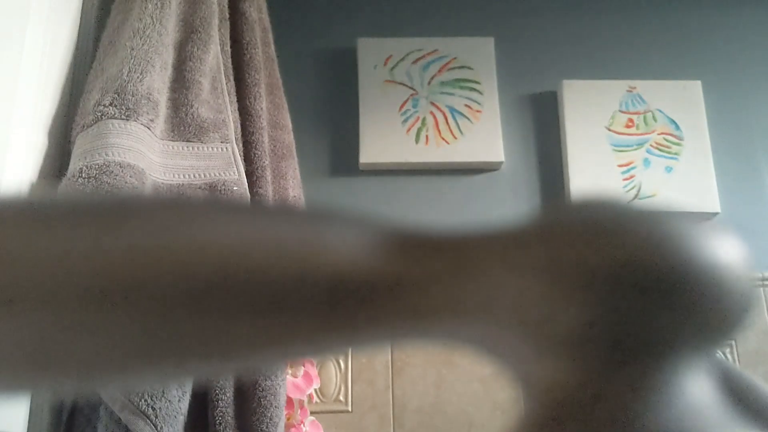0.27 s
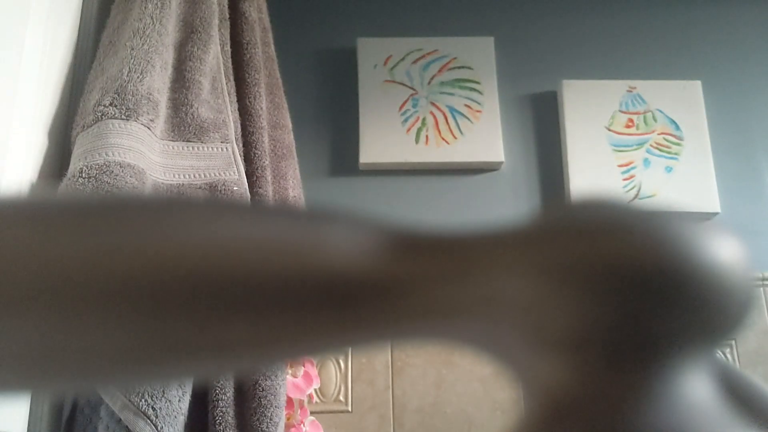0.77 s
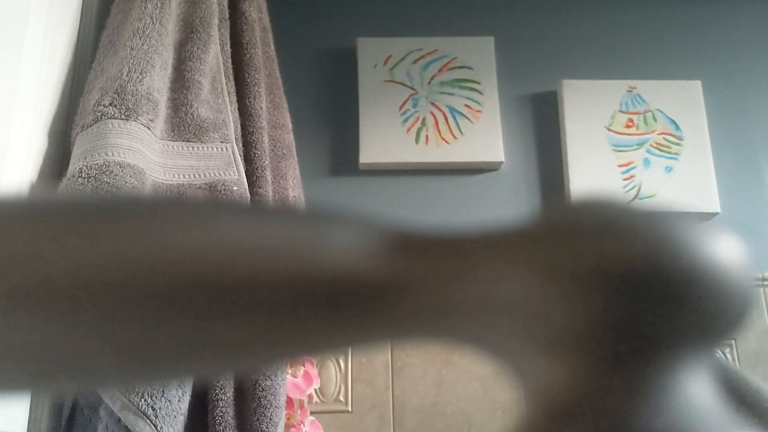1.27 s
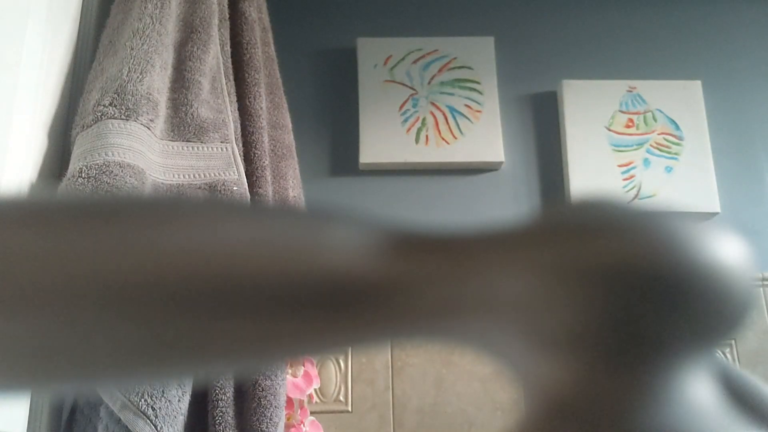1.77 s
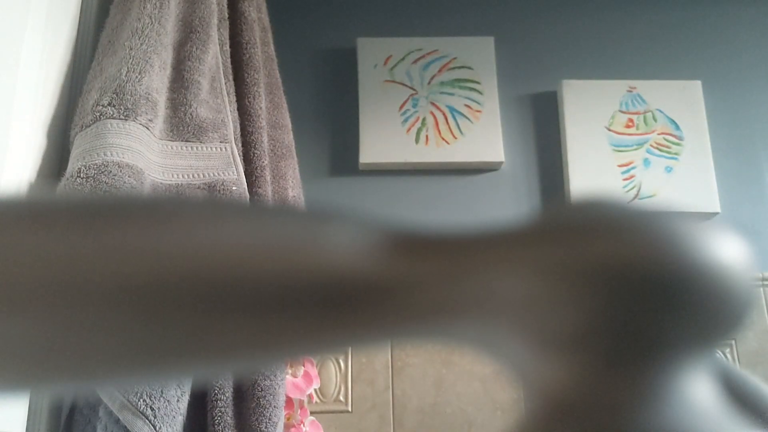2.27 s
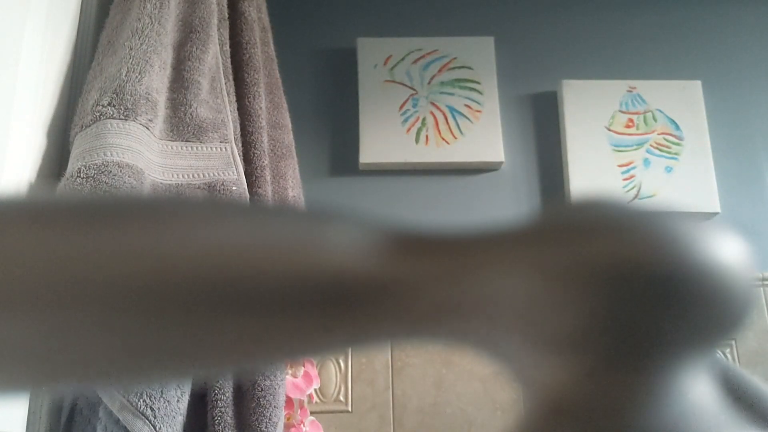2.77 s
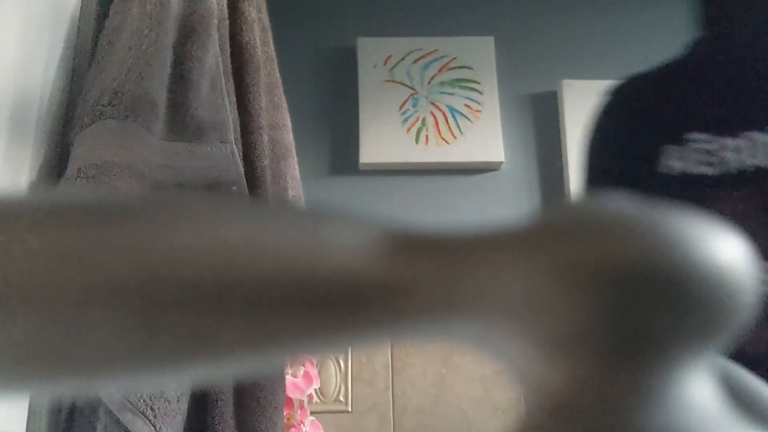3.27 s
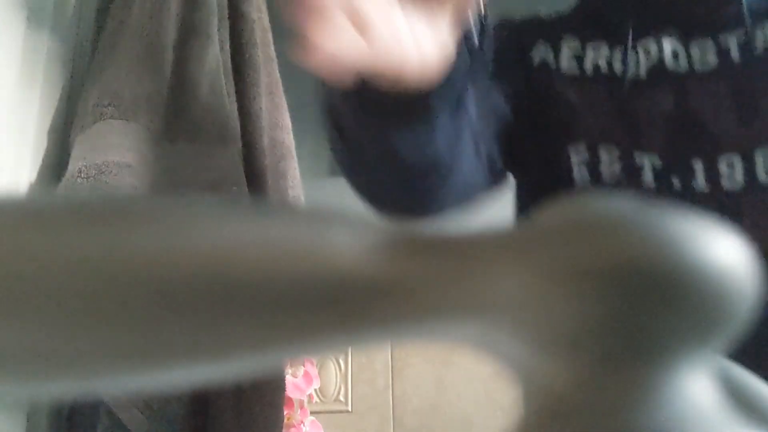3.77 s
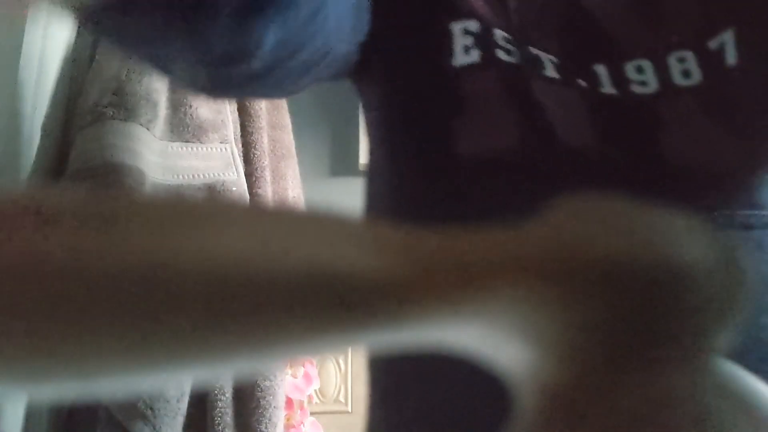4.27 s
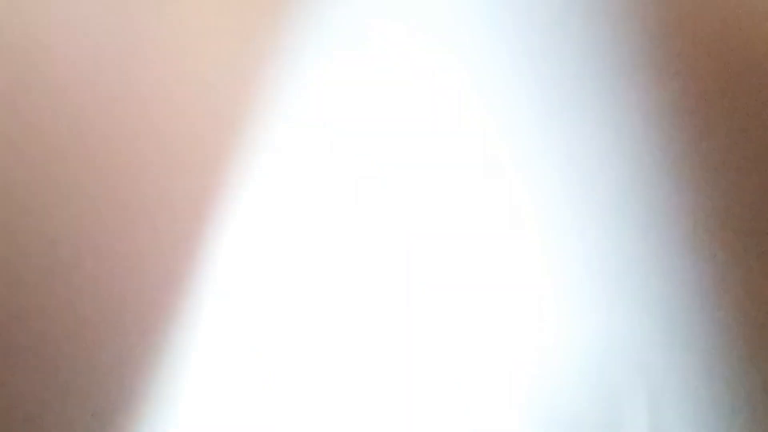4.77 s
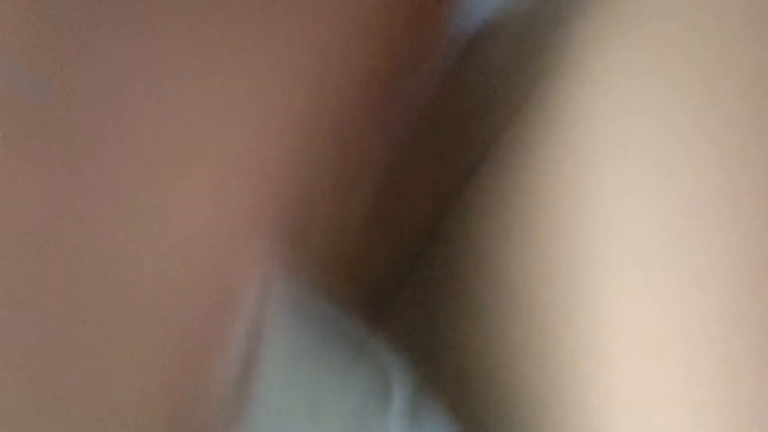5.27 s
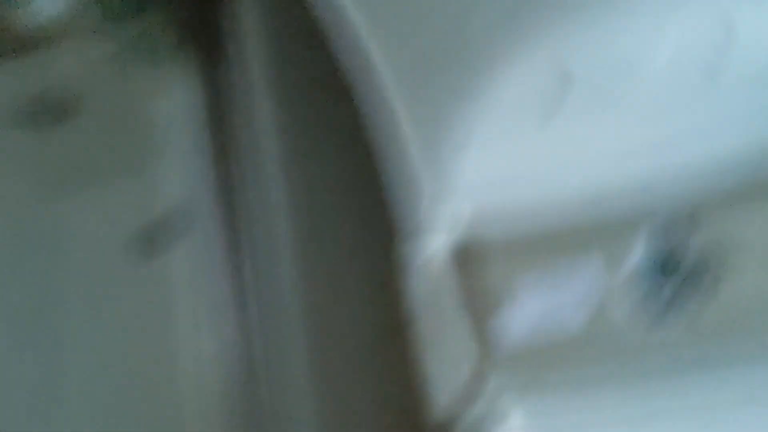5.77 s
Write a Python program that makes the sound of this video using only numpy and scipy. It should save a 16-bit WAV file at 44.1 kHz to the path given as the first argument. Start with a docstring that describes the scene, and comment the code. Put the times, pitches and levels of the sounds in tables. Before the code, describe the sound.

A phone microphone rests in a quiet, short-echoing bathroom. A footstep and fabric rustle come first, then delicate ceramic clinks and a pause. A sharp porcelain crack rings out, followed by rapid dull hollow bumps as the lid settles. Someone shuffles over, clothes brushing, and grabs the phone, with chattering plastic knocks, booming pressure thumps, taps and gritty rubbing until the end.

```python
"""First a low rumble and thin hiss, rustling cloth and a step; then a porcelain lid clinks, knocks and bumps
down hollowly in a small tiled bathroom. A hand picks up the phone, whose case it thumps, taps and rubs.
The lid sounds by modal synthesis, the steps by decaying noise, the air and cloth by filtered noise.
The finger sounds are pressure pulses, broadband impacts and granular friction, close to two microphones."""
import sys
import numpy as np
from scipy import signal
from scipy.fft import rfft, irfft, next_fast_len
from scipy.io import wavfile
from scipy.ndimage import uniform_filter1d

SR = 44100
rng = np.random.default_rng(int(sys.argv[2]) if len(sys.argv) > 2 else 0)


def wrap_up_sound(samples):
    """Save the sound to the file named by the first command line argument, as 16-bit audio."""
    columns = np.atleast_2d(samples).T
    # keep every value between -1 and 1, then stretch to whole-number steps
    tamed = np.clip(columns, -1, 1)
    steps = np.round(tamed * 32767).astype(np.int16)
    wavfile.write(sys.argv[1], SR, steps)


N = 264776
T = np.arange(N) / SR


def amp(db):
    """Converts a level in decibels to a linear amplitude ratio."""
    return 10 ** (np.asarray(db) / 20)


def unit(x):
    """Normalises the root mean square to one."""
    return x / np.sqrt(np.mean(x ** 2) + 1e-20)


def read(points, hz):
    """Interpolates a table linearly over logarithmic frequency."""
    f, value = np.transpose(points)
    return np.interp(np.log(hz + 1), np.log(f), value)


def add(mix, s, sound):
    """Superposes a stereo sound on the mix from time s."""
    part = mix[:, max(round(s * SR), 0):][:, :sound.shape[1]]
    part += sound[:, :part.shape[1]]


def coloured(x, db_at):
    """Zero-phase linear filtering: scales the spectrum by a function from Hz to dB."""
    length = x.shape[-1]
    size = next_fast_len(length)
    gain = amp(db_at(np.fft.rfftfreq(size, 1 / SR)))
    return irfft(rfft(x, size) * gain, size)[..., :length]


def octaves(hz):
    """Logarithmic pitch distance: octaves above 1 kHz, held constant below 100 Hz."""
    return np.log2(np.maximum(hz, 100) / 1000)


def resonance_db(f, hz, width_hz):
    """Resonance curve: the level falls 6 dB at width_hz either side of the centre."""
    return -20 * np.log10(1 + ((f - hz) / width_hz) ** 2)


def stroke(t, length, attack_s, release_s):
    """Movement envelope: linear attack from t = 0, hold, then exponential release."""
    return np.clip(t / attack_s, 0, 1) * np.exp(-np.maximum(t - length, 0) / release_s)


# still air in the room: [f/Hz, spectral level/dB per Hz]
AIR_COLOUR = [(15, -2.5), (35, -7.5), (70, -16), (110, -15.5), (200, -19), (300, -17), (400, -25.5),
              (700, -23), (1050, -23), (1500, -34.5), (2000, -35), (4500, -34), (10000, -43.5),
              (16000, -53)]
# peaks and a dip in the colour of the rumble and hiss: [f/Hz, width/Hz, level/dB]
AIR_PEAKS_AND_DIP = [(101.4, 3.5, 11), (251.5, 5.3, 8.5), (530, 120, 5.5), (2880, 330, 3), (3430, 130, 2),
                     (6470, 230, -6.5), (7440, 550, 4.5), (9490, 600, 5.5)]


def room_noise():
    """Stationary noise: one coloured spectrum, split at 250 Hz into rumble and hiss."""
    def level_db(f):
        local_db = sum(db * np.exp(-((f - hz) / width) ** 2) for hz, width, db in AIR_PEAKS_AND_DIP)
        return read(AIR_COLOUR, f) + local_db

    noise = coloured(rng.standard_normal((2, N)), level_db)
    low = signal.sosfiltfilt(signal.butter(4, 250, fs=SR, output="sos"), noise)
    return unit(low), unit(noise - low)


def air(rumble_db=-47.0, hiss_db=-55.5):
    """Superposition of stationary noises: a steady low rumble and a thin hiss."""
    rumble, hiss = room_noise()
    return amp(rumble_db) * rumble + amp(hiss_db) * hiss


# clothing rustles while the body moves: [start t/s, length/s, level/dB]
CLOTH_MOVES = [(0, 0.29, -52), (0.49, 0.92, -59.5), (2.753, 1.76, -56), (3.124, 0.15, -53),
               (3.82, 0.045, -47.5), (4.25, 0.14, -51), (4.629, 1.7, -53)]


def clothing(tilt=2, attack_s=0.036, release_s=0.054):
    """Power addition of movements: cloth hisses with each one, tilt dB per octave brighter than the air."""
    _, hiss = room_noise()
    cloth = unit(coloured(hiss, lambda f: tilt * octaves(f)))
    power = np.zeros(N)
    for s, length, db in CLOTH_MOVES:
        power += (amp(db) * stroke(T - s, length, attack_s, release_s)) ** 2
    return cloth * np.sqrt(power)


# reverberation of the tiled room: [f/Hz, t60/s]
ROOM = [(100, 0.37), (500, 0.34), (1500, 0.32), (4000, 0.36), (8000, 0.3), (16000, 0.37)]


def tail(colour, tilt):
    """Diffuse reverberation: a burst scattered by the tiles, each band dying at the room's pace."""
    noise = rng.standard_normal((2, SR * 3 // 4))
    noise = unit(coloured(noise, lambda f: read(colour, f) + tilt * octaves(f)))
    hz, t, bands = signal.stft(noise, SR, nperseg=256)
    decay_db = -60 * t / read(ROOM, hz)[:, None]
    return signal.istft(bands * amp(decay_db), SR, nperseg=256)[1][:, :noise.shape[1]]


# steps around the room: [t/s, level/dB, brightness/dB per octave]
STEPS = [(.096, -34.5, .5), (0.554, -49.5, -1.5), (3.088, -38.5, -2), (3.301, -49, 2), (3.672, -47.5, 2),
         (3.754, -45, -1.5), (4.065, -37, 1.5)]
# a step's noise: [f/Hz, spectral level/dB per Hz]
STEP_COLOUR = [(50, -31), (150, -4), (270, 4.5), (600, 2.5), (950, 2.5), (1500, -17), (2000, -13.5),
               (2800, -13), (3800, -16.5), (5200, -18), (8000, -28.5), (12000, -33), (16000, -45)]
# the sole scuffs just after the heel lands, softer and brighter (tilt in dB per octave)
STEP_RISE_S, SCUFF_DELAY_S, SCUFF_DB, SCUFF_TILT = .009, .027, -2, 1.68


def steps(early=1.0, early_s=0.13):
    """Damped impact in a reverberant field: heel, then sole, noise without ring."""
    out = np.zeros((2, N))
    for s, db, tilt in STEPS:
        heel = tail(STEP_COLOUR, tilt)
        sole = tail(STEP_COLOUR, tilt + SCUFF_TILT)
        t = np.arange(heel.shape[1]) / SR
        shape = amp(db) * np.minimum(t / STEP_RISE_S, 1) * (1 + early * np.exp(-t / early_s))
        add(out, s, shape * heel)
        add(out, s + SCUFF_DELAY_S, amp(SCUFF_DB) * shape * sole)
    return out


# the floor booms softly as the weight shifts: [crest t/s, level/dB]
WEIGHT_SHIFTS = [(.42, -51.5), (1.27, -45.5), (1.69, -52), (2.57, -46), (3.17, -47), (3.93, -47)]


def floorboards(hz=56, width_hz=5, swell_s=0.17):
    """Single-mode resonance: the floor booms at its own frequency, swelling as the weight shifts."""
    noise = coloured(rng.standard_normal(N), lambda f: resonance_db(f, hz, width_hz))
    # keep the wandering phase, discard the wandering level
    boom = unit(np.cos(np.angle(signal.hilbert(noise))))
    return boom * sum(amp(db) * np.exp(-((T - s) / swell_s) ** 2) for s, db in WEIGHT_SHIFTS)


def struck(blows, modes, colour, ring_db, noise_db, early, early_s, rise_s, spot_db):
    """Modal superposition: each blow rings damped modes, favours some, and excites the near walls and room."""
    out = np.zeros((2, N))
    hz, mode_db, t60 = np.transpose(modes)[:, :, None]
    for s, db, tilt, spot_hz in blows:
        burst = tail(colour, tilt)
        t = np.arange(burst.shape[1]) / SR
        # the near walls return the first part strongly
        burst *= (1 + early * np.exp(-t / early_s)) * (1 - np.exp(-t / 0.0028))
        favour_db = spot_db * np.exp(-(np.log(hz / spot_hz) / 0.041) ** 2)
        heights = amp(mode_db + tilt * octaves(hz) + favour_db)
        # the spot and brightness redistribute the modes at constant total strength
        heights *= np.linalg.norm(amp(mode_db)) / np.linalg.norm(heights)
        damped = np.exp((2j * np.pi * hz - np.log(1000) / t60) * t)
        ring = (heights * damped).sum(0) * (1 - np.exp(-t / rise_s))
        stereo_ring = np.array([ring.imag, ring.real])
        add(out, s, amp(db) * (amp(ring_db) * stereo_ring + amp(noise_db) * burst))
    return out


# light touches of the lid: [t/s, level/dB, brightness/dB per octave, favoured f/Hz]
CLINKS = [(.56, -51.5, -14, 1600), (.575, -58.5, -10, 2384), (.993, -29.5, 5, 7230), (1.002, -31, -1, 2610),
          (1.054, -33.5, 0.5, 4451), (1.058, -37.5, -1, 2384), (1.262, -54.5, 4, 2740),
          (1.365, -52, 0, 1600)]
# the lid's ring when lightly touched: [f/Hz, level/dB, t60/s]
CLINK_MODES = [(1165, -11.5, 0.83), (1600, -9.5, 0.2), (2384, -17.5, 0.38), (2610, -10, 0.27),
               (2530, -43, 2.9), (3515, -6.5, 0.31), (4451, -18.5, 0.22), (4660, -12, 0.15),
               (5570, -18, .25), (7100, -11, 0.054), (7460, -6.5, 0.08), (7700, -8, 0.084),
               (9000, -18, 0.13), (11500, -21, 0.17)]
# the sharp noise of such a touch: [f/Hz, spectral level/dB per Hz]
CLINK_COLOUR = [(100, -30), (800, -13), (1200, -2), (1900, -5), (2700, 7.5), (3900, 1), (4700, 6.5),
                (6300, 0.5), (7400, 3), (8600, -1), (10000, 2), (13000, -8), (16000, -19)]


def lid_clinks():
    """Modal ringing under light contact: porcelain clinks with a sharp noise."""
    return struck(CLINKS, CLINK_MODES, CLINK_COLOUR, ring_db=2.5, noise_db=-10,
                  early=3.1, early_s=0.0049, rise_s=0.0042, spot_db=12)


def lid_slip(start_s=1.24, length_s=0.31, fade_s=.08, level_db=-64.5, hz=2660, width_hz=14):
    """Friction-sustained resonance: sliding on the rim keeps one porcelain mode singing faintly."""
    ring = coloured(rng.standard_normal((2, N)), lambda f: resonance_db(f, hz, width_hz))
    return amp(level_db) * unit(ring) * stroke(T - start_s, length_s, fade_s, fade_s)


# the lid knocks, chatters and settles: [t/s, level/dB, brightness/dB per octave, favoured f/Hz]
KNOCKS = [(2.206, -22, 3.5, 2370), (2.213, -22, 0, 1190), (2.220, -17.5, 0.5, 1000), (2.238, -39, 2, 2660),
          (2.254, -32.5, -12, 5150), (2.415, -37, -4.5, 818)]
# porcelain struck hard: [f/Hz, level/dB, t60/s]
KNOCK_MODES = [(461, -4, 0.35), (517, 4.5, 0.24), (610, -12, 0.56), (708, -5, 0.12), (817, 2.5, 0.18),
               (961, -7, 0.42), (970, 8, 0.057), (1034, -15, 0.39), (1140, -17.5, 0.3), (1603, -16, 0.39),
               (1890, -9, 0.19), (2240, -27, .21), (2300, -22, 0.25), (2763, -17, 0.21), (2670, -10, 0.3),
               (2720, -10, 0.19), (2970, -20, 0.16), (3040, -26, 0.19), (4890, -27, 0.25),
               (5180, -16, 0.35), (5260, -18, 0.21), (5800, -24, 0.32), (7030, -19, 0.12)]
# the crack of the knock: [f/Hz, spectral level/dB per Hz]
KNOCK_COLOUR = [(60, -31), (250, 1), (600, -27), (1050, 4), (1480, -14.5), (2000, -10.5), (2700, -7),
                (3700, -18), (5200, -12.5), (6200, -23.5), (7200, -17), (8400, -28.5), (13000, -37.5),
                (16000, -60)]


def lid_knocks():
    """Modal ringing under hard impact: a dense porcelain ring with a crack."""
    return struck(KNOCKS, KNOCK_MODES, KNOCK_COLOUR, ring_db=-1.0, noise_db=-5.5,
                  early=2.7, early_s=0.0043, rise_s=0.0043, spot_db=10.0)


# hollow bumps as the weight comes down: [t/s, level/dB, brightness/dB per octave, favoured f/Hz]
BUMPS = [(2.304, -21.5, 6, 337), (2.332, -21, -4, 135), (2.366, -29, 6.5, 258), (2.418, -24.5, 2, 258),
         (2.447, -23.5, 0.5, 130.7), (2.474, -27, 0, 220)]
# the hollow boom: [f/Hz, level/dB, t60/s]
BUMP_MODES = [(137, -5, 0.258), (221.3, 0.5, 0.33), (258, -2.5, 0.36), (347, -7.5, 0.064), (398, -20, 0.23)]
# its dull thud: [f/Hz, spectral level/dB per Hz]
BUMP_COLOUR = [(30, 1), (80, -28), (150, -12), (260, 8.5), (400, -26), (700, -22), (2000, -51),
               (16000, -94)]


def lid_bumps():
    """Low-order modal resonance: a few low modes give the hollow boom, low noise its thud."""
    return struck(BUMPS, BUMP_MODES, BUMP_COLOUR, ring_db=-1, noise_db=-5.5,
                  early=0.45, early_s=0.025, rise_s=0.0021, spot_db=3.5)


# the phone swaying in the hand: [f/Hz, spectral level/dB per Hz]
SWAY_COLOUR = [(5, 6), (16, -2), (33, 7), (58, -10), (115, -17), (300, -42), (800, -63), (4000, -100)]
# the hand closes on the phone and sways it from then on, harder while the skin slides
GRAB_S, GRAB_RISE_S, SWAY_DB, SLIDE_SWAY_DB, SLIDE_EASE_S = 4.39, 0.018, -29, -32, 0.02


def hand_sway():
    """Low-frequency random pressure: the hand sways the phone, harder while the skin slides."""
    sway = unit(coloured(rng.standard_normal(N), lambda f: read(SWAY_COLOUR, f)))
    slides = [stroke(T - s, length, SLIDE_EASE_S, SLIDE_EASE_S) for s, length, *_ in RUBS]
    sliding = np.max(slides, axis=0)
    grabbed = np.clip((T - GRAB_S) / GRAB_RISE_S, 0, 1)
    return sway * (amp(SWAY_DB) * grabbed + amp(SLIDE_SWAY_DB) * sliding)


# fingers press and release the phone: [t/s, peak level before port balance/dB, f/Hz]
THUMPS = [(4.41, -12.5, 65), (4.468, -10, 77), (4.797, -5.5, 85), (4.868, -10, 55), (4.909, -10, 26.75),
          (4.95, -12.5, 40), (5.064, 1, 109), (5.094, -9.5, 31.5), (5.109, -2, 83), (5.218, -12.5, 39.4),
          (5.582, -18.5, 44.3), (5.852, -3, 87), (5.966, -4.5, 70)]


def finger_thumps(skirt=1.08):
    """Bipolar pressure pulse: a finger squeezes the air at the ports and lets go, one push, one pull."""
    pressure = np.zeros(N)
    for s, db, hz in THUMPS:
        u = 2 * np.pi * hz * (s - T)
        pressure += amp(db) * u * np.exp((1 - abs(u) ** skirt) / skirt)
    return pressure


# with the hand around the phone, the right port lags the left: [f/Hz, phase/rad]
PORT_LAG = [(1, -2.5), (30, .5), (60, 0.94), (125, 1.7), (250, 2.2), (450, 2.45), (900, 2.1), (1300, 1.5),
            (16000, -2)]
HELD_S = 4.72


def through_case(x, held=True):
    """Structure-borne transmission: the case feeds both ports; once held, the right is phase-shifted."""
    size = 2 * len(x)
    lag = held * read(PORT_LAG, np.fft.rfftfreq(size, 1 / SR))
    return np.array([x, irfft(rfft(x, size) * np.exp(-1j * lag))[:len(x)]])


def hand_pressure(left_db=-1, right_db=1):
    """Superposition of pressures: sway and thumps, the ports' phase shift fading in over 50 ms."""
    pressure = hand_sway() + finger_thumps()
    held = np.clip((T - HELD_S) * 20 + .5, 0, 1)
    return (held * through_case(pressure) + (1 - held) * pressure) * amp([[left_db], [right_db]])


def case_blows(blows, pan_db, low_hz, steepness, rattle, lead_s, rattle_s, case_db, scrape_db,
               snap_rattle=0.24, snap_s=0.0015, case_hz=460, case_t60=0.043, scrape_s=0.0061,
               shade_hz=1400):
    """Contact bandwidth: hardness sets the edge of a rattling knock, with case ring, snap and scrape."""
    out = np.zeros((2, N))
    t = np.arange(-SR // 20, SR // 10) / SR
    contact = 1. * (t == 0)
    after = np.maximum(t, 0)
    highpass = signal.butter(1, low_hz, "high", fs=SR, output="sos")
    snap_band = signal.butter(1, [1600, 5000], "band", fs=SR, output="sos")
    snap_top = signal.butter(1, 12000, fs=SR, output="sos")
    for s, db, edge_hz, snap_db, snap_pan_db in blows:
        # the rattle swells before contact and dies after it
        chatter = rng.standard_normal(len(t)) * np.exp(-abs(t) / np.where(t < 0, lead_s, rattle_s))
        blow = contact + rattle * chatter
        knock = coloured(blow, lambda f: -10 * np.log10(1 + (f / edge_hz) ** steepness))
        knock = signal.sosfilt(highpass, knock)
        case_ring = amp(case_db - 60 * after / case_t60) * np.sin(2 * np.pi * case_hz * after)
        knock = knock / abs(knock).max() + case_ring

        crackle = rng.standard_normal((2, len(t))) * (t > 0) * np.exp(-after / snap_s)
        snap = contact + snap_rattle * crackle
        snap = signal.sosfilt(snap_top, signal.sosfilt(snap_band, snap))

        scrape = rng.standard_normal((2, len(t)))
        scrape = unit(coloured(scrape, lambda f: read(RUB_COLOUR, f) - 3 * octaves(f)))
        scrape *= amp(scrape_db) * np.exp(-abs(t) / scrape_s)

        dull = amp(db + np.array([[pan_db], [-pan_db]]) / 2) * through_case(knock, s > HELD_S)
        crisp = amp(snap_db) * (snap / abs(snap).max() + scrape)
        # the port farther from the blow loses its treble
        far_db = np.minimum([[snap_pan_db], [-snap_pan_db]], 0)
        add(out, s + t[0], coloured(dull + crisp, lambda f: far_db * f ** 2 / (f ** 2 + shade_hz ** 2)))
    return out


# the phone chatters against its perch as it is lifted:
# [t/s, knock level/dB, upper edge f/Hz, crisp snap level/dB, treble left minus right/dB]
PHONE_KNOCKS = [(4.4103, -2, 1730, -41, 2.5), (4.455, -32, 1900, -39, 8), (4.460, -8, 1840, -32, 7),
                (4.4654, -0.5, 1110, -16.5, 2), (4.472, -9.5, 626, -33, 6), (4.477, -22, 1800, -48, -2),
                (4.682, -16, 1770, -27.5, 10)]


def phone_knocks():
    """Chattering contact: the phone rocks on its perch around each knock, nearer the left port."""
    return case_blows(PHONE_KNOCKS, pan_db=7.5, low_hz=90, steepness=21.4, rattle=0.053,
                      lead_s=0.0039, rattle_s=0.0059, case_db=-25, scrape_db=-14)


def knock_echo(room_db=-28, tilt=-5.5):
    """Diffuse reflection: the tiles return the phone's knocks as a dull wash."""
    out = np.zeros((2, N))
    for s, db, *_ in PHONE_KNOCKS:
        add(out, s, amp(db + room_db) * tail(STEP_COLOUR, tilt))
    return out


# skin slides over the right microphone: [start t/s, length/s, level/dB, brightness/dB per octave]
RUBS = [(4.66, 0.02, -42, -1), (4.727, 0.034, -41.5, 3), (4.82, 0.022, -29.5, 2), (4.837, .09, -35, -0.5),
        (4.857, 0.02, -27.5, -.5), (4.93, 0.0099, -22, 6.5), (4.953, .29, -37, -1),
        (4.993, 0.063, -35, 1.5), (5.185, 0.1, -35, -6), (5.311, 0.02, -35, -2), (5.521, 0.037, -27, 2.3),
        (5.581, 0.048, -33, 6), (5.633, .295, -36, -1.5), (5.716, 0.029, -38, 5.5),
        (5.796, 0.044, -27.5, -1.5), (5.959, 0.031, -35, 1)]
# skin on the case: [f/Hz, spectral level/dB per Hz]
RUB_COLOUR = [(100, -24), (450, 10), (850, 6), (1500, 0), (1900, 3), (2600, 7.5), (4000, 0.5), (5800, 2.5),
              (7500, -2.5), (9600, -4), (12000, -12.5), (15000, -20), (16500, -41)]
# how much of it reaches the left microphone: [f/Hz, level/dB]
RUB_LEFT = [(400, -1.5), (1000, -11.5), (2500, -24), (16000, -21)]


def rubbing(grain_db=4.5, flutter_db=3, patchy_db=3, attack_s=0.004, release_s=0.0086):
    """Stick-slip friction: skin sheds tiny grains, the changing gap under the finger colours them."""
    out = np.zeros((2, N))
    t = np.arange(SR // 2) / SR
    for s, length, db, tilt in RUBS:
        grains = rng.standard_normal(len(t))
        flutter = unit(uniform_filter1d(rng.standard_normal(len(t)), size=260))
        sizes_db = grain_db * grains + flutter_db * flutter
        friction = rng.standard_normal((2, len(t))) * amp(sizes_db)
        friction = unit(coloured(friction, lambda f: read(RUB_COLOUR, f) + tilt * octaves(f)))
        add(out, s, amp(db) * friction * stroke(t, length, attack_s, release_s))
    bands = signal.stft(out, nperseg=512)[2]
    # random gains smoothed over frequency, then time
    patches = uniform_filter1d(rng.standard_normal(bands.shape[1:]), size=7, axis=0)
    patches = unit(uniform_filter1d(patches, size=9, axis=1))
    left, right = signal.istft(bands * amp(patchy_db * patches - 1), nperseg=512)[1][:, :N]
    return np.array([coloured(left, lambda f: read(RUB_LEFT, f)), right])


# fingertips tap the case:
# [t/s, knock level/dB, upper edge f/Hz, crisp snap level/dB, treble left minus right/dB]
TAPS = [(4.79, -11.5, 615, -51, 10), (4.8, -13.5, 850, -38, 1), (4.863, -18, 900, -12, -13),
        (4.873, -17, 1070, -8.5, -20), (4.947, -10.5, 673, -24, -4), (4.987, -18, 600, -41, -13),
        (5.0555, -13.5, 1600, -44, -15), (5.193, -7.5, 575, -29, 9), (5.232, -17, 1600, -29, -4),
        (5.257, -14, 900, -15, 1), (5.266, -4, 600, -34, 14), (5.317, -9, 720, -12.5, -3),
        (5.474, -27, 2690, -22.5, -25), (5.503, -26.5, 1190, -22, -27), (5.596, -3, 2020, -4, -31),
        (5.660, -19.5, 880, -23, -23), (5.740, -14.5, 1010, -20.5, 7), (5.802, -14.5, 980, -17, -8),
        (5.823, -10, 980, -6.5, -21), (5.956, -4, 1030, -12, -19)]
# the skin catches in faint ticks as it slides; the spread applies either way to knock and snap
CATCH_DB, CATCH_SPREAD_DB, CATCH_EDGE_HZ, CATCH_SNAP_DB, CATCH_PAN_DB = -54, 12, 1200, -28.5, -18


def fingertips(count=12):
    """Short-contact impacts: firm taps and random faint catches of the rub, nearer the right port."""
    start, length = np.transpose(RUBS)[:2]
    catches = []
    for which, when, size in rng.random((count, 3)):
        # longer rubs catch more often
        k = np.searchsorted(np.cumsum(length), which * length.sum())
        s = start[k] + when * length[k]
        extra_db = CATCH_SPREAD_DB * (2 * size - 1)
        catches.append((s, CATCH_DB + extra_db, CATCH_EDGE_HZ, CATCH_SNAP_DB + extra_db, CATCH_PAN_DB))
    return case_blows(TAPS + catches, pan_db=-3.5, low_hz=167, steepness=8.7, rattle=0.19,
                      lead_s=0.00023, rattle_s=0.0015, case_db=-10.5, scrape_db=-18)


# likeness of the two microphones for sound from the room: [f/Hz, correlation]
LIKENESS = [(60, 0.98), (180, 0.93), (430, -0.5), (700, 0.019), (1100, 0.51), (1450, -0.045), (2050, -0.55),
            (2550, 0.92), (3000, 0.68), (3500, -0.87), (4000, -0.37), (4800, 0.11), (6000, 0.35),
            (7000, 0.93), (12000, 1)]
# the share that reaches the right microphone a quarter cycle early: [f/Hz, correlation]
RIGHT_LEAD = [(60, -0.34), (260, 0.69), (550, -0.12), (850, 0.46), (1500, -0.43), (2400, -0.04)]


def microphones(x, right_db=-1):
    """Interchannel coherence: two ports hear the room alike in some bands and opposed in others."""
    a, b = rfft(x, 2 * N)
    hz = np.fft.rfftfreq(2 * N, 1 / SR)
    same = read(LIKENESS, hz) + 1j * read(RIGHT_LEAD, hz)
    same /= np.maximum(abs(same), 1)
    independent = np.sqrt(abs(1 - abs(same) ** 2))
    right = amp(right_db) * (same * a + independent * b)
    return irfft(np.array([a, right]))[:, :N]


def scene():
    """Superposition of paths: the room through the air, the hand through the case."""
    lid = lid_clinks() + lid_slip() + lid_knocks() + lid_bumps()
    room = microphones(air() + clothing() + steps() + lid + knock_echo()) + floorboards()
    return room + hand_pressure() + phone_knocks() + rubbing() + fingertips()


def record(dry, limit_db=-3, recovery_db=90, ceiling=0.94, cutoff_hz=16500):
    """Peak limiting: loud peaks duck the level, which then recovers; crests round off, the band ends steeply."""
    # the held overshoot falls by recovery_db each second
    fall = T * recovery_db
    peak_db = 20 * np.log10(abs(dry).max(0) + 1e-9)
    over_db = np.maximum(np.maximum.accumulate(peak_db + fall) - fall - limit_db, 0)
    # only part of the overshoot is taken off
    held = dry * amp(-.6 * uniform_filter1d(over_db, size=64))
    held = held / (1 + (held / ceiling) ** 8) ** (1 / 8)
    lowpass = signal.firwin(511, cutoff_hz, window=("kaiser", 9), fs=SR)
    return signal.oaconvolve(held, lowpass[None], "same", axes=1)


dry = scene()
out = record(dry)
wrap_up_sound(out)
```